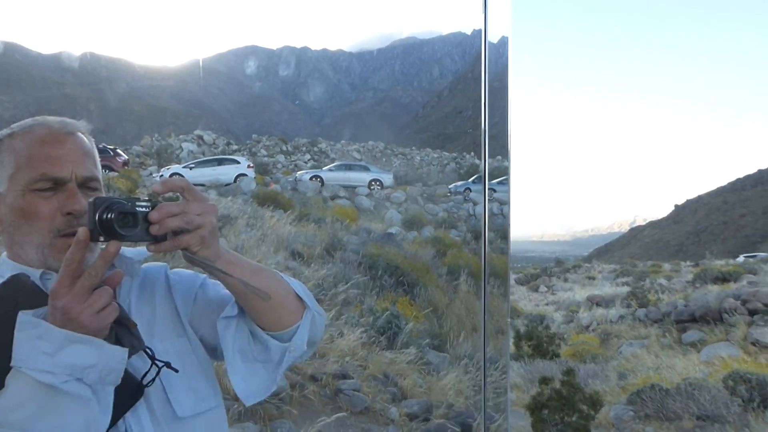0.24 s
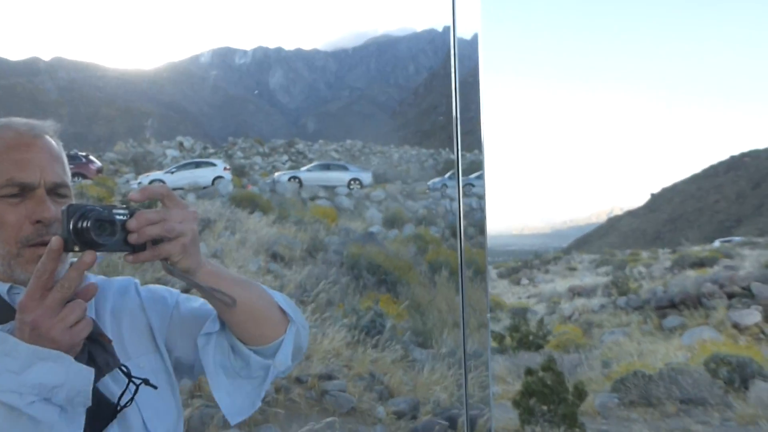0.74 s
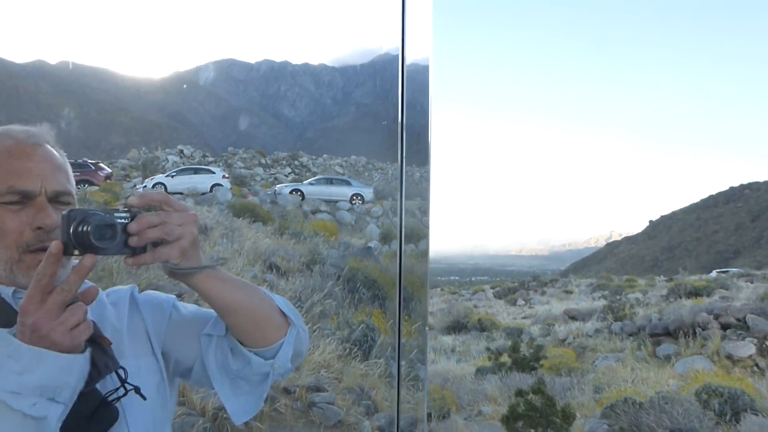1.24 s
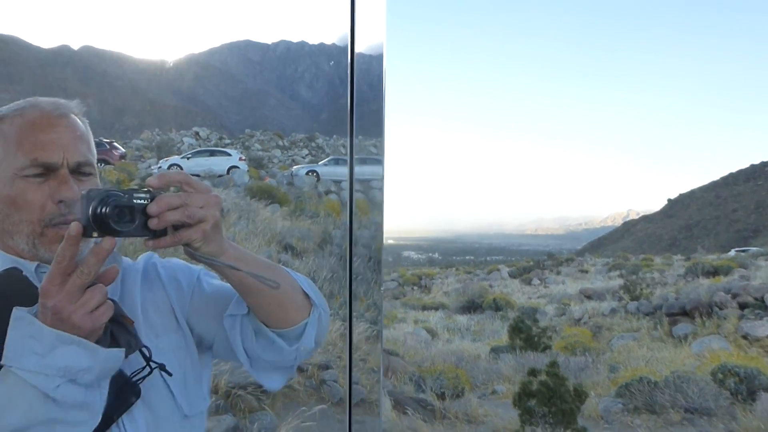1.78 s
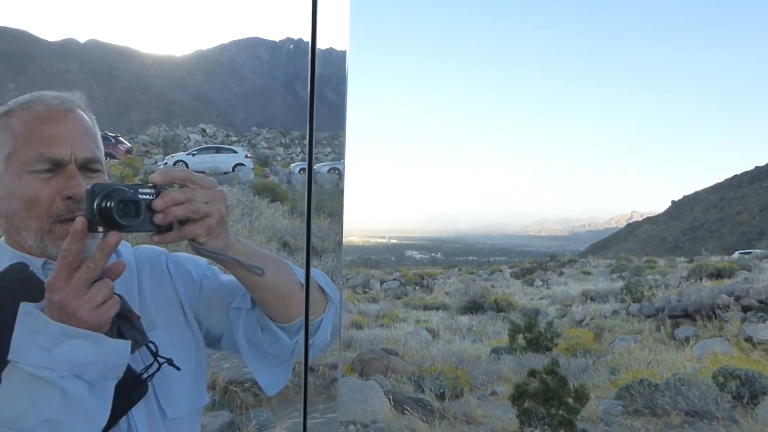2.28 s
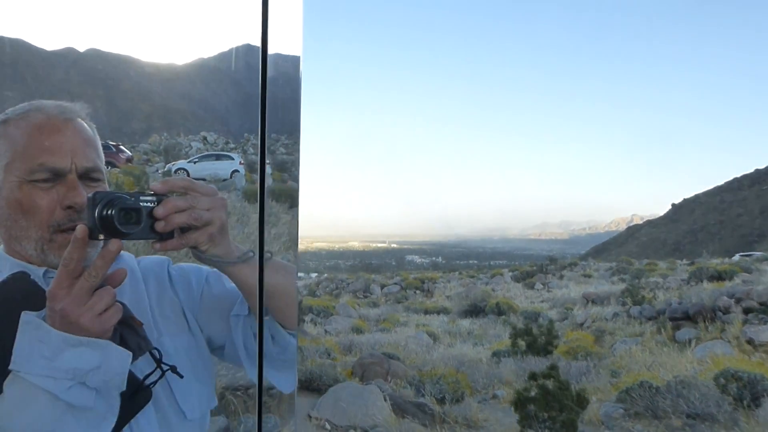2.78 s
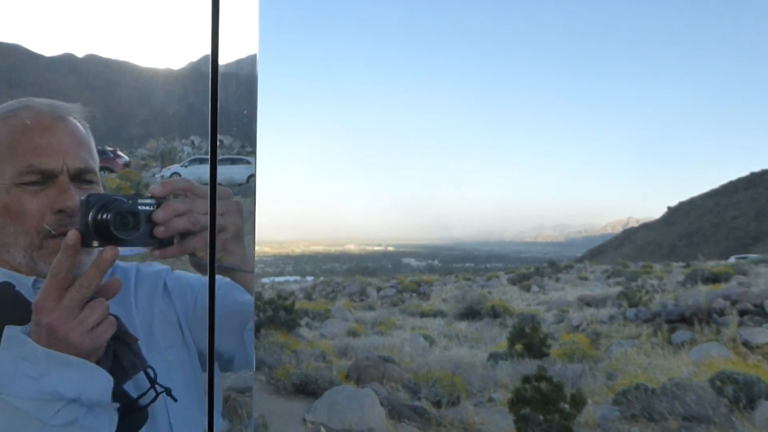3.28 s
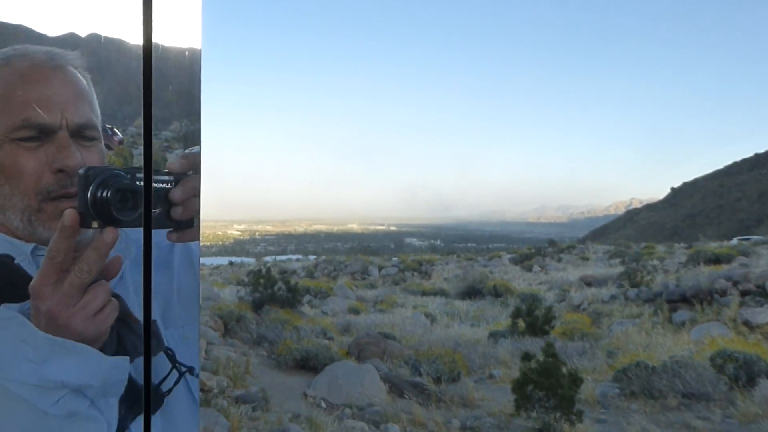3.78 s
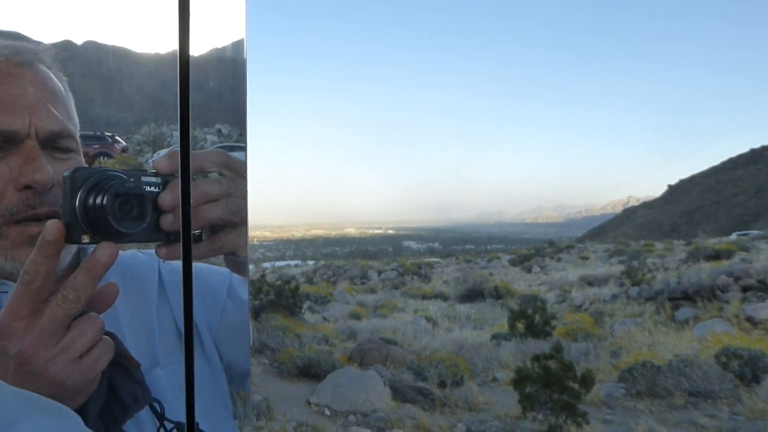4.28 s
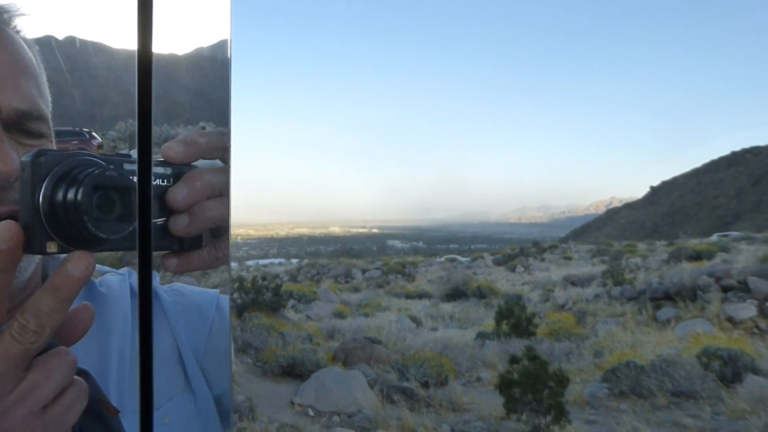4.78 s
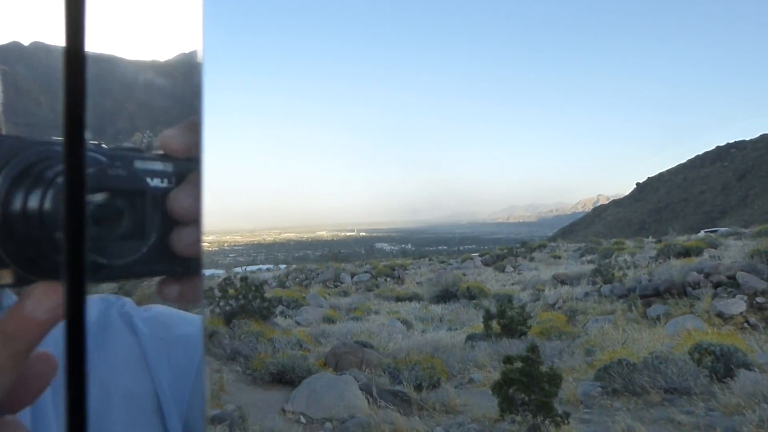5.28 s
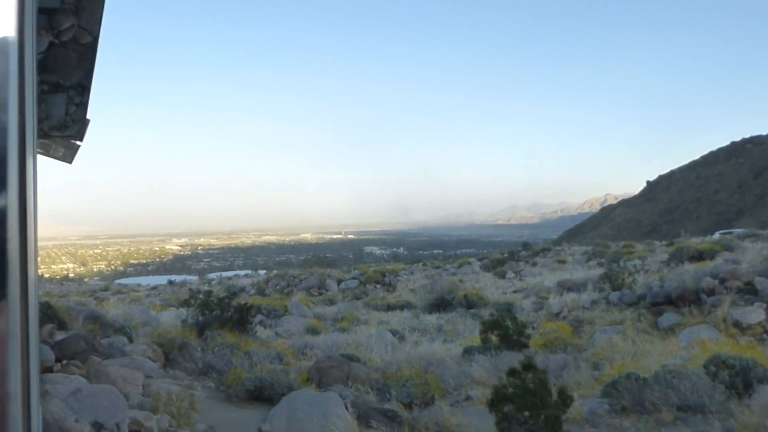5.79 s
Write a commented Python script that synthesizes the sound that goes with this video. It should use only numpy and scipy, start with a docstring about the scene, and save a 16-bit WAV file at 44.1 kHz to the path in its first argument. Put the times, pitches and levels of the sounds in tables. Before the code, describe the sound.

A continuous rough rush of wind swells and eases outdoors, rumbling and thumping on the microphone.

```python
"""A strong, gusty wind rushes, rumbles and thumps across a small microphone in open, dry hills.
The rush is made of eddies (little swirls of air) passing the microphone's opening. Faster air
carries finer eddies, so the treble rises far more than the roar, the lower body of the sound.
Short puffs sharpen the rush. Large eddies thump and rumble on the diaphragm, the thin skin
inside the microphone."""
import sys
import numpy as np
from scipy import signal
from scipy.io import wavfile
from scipy.ndimage import uniform_filter1d

SR = 44100
rng = np.random.default_rng(int(sys.argv[2]) if len(sys.argv) > 2 else 0)


def log_audio(samples):
    """Write samples as a 16-bit WAV file to the path given in sys.argv[1]."""
    # one column per channel
    frames = np.atleast_2d(samples).T
    # limit to full scale, then quantise
    limited = np.clip(frames, -1, 1)
    pcm = np.round(limited * 32767).astype(np.int16)
    wavfile.write(sys.argv[1], SR, pcm)


N = 266584

# The wind's slow swell; "gust" mainly sets the treble. Columns: time_s, gust_db, roar_db, rumble_db
WIND_SWELL = [(0.0, -39.5, -21, -27), (0.2, -43.5, -25.5, -28), (0.45, -45, -23.5, -26),
              (0.8, -49.5, -25, -28.5), (1.1, -44.5, -28.5, -24), (1.45, -41, -30, -30.5),
              (1.85, -41, -28, -28), (2.13, -50, -28.5, -31), (2.45, -44, -30, -25),
              (2.8, -42.5, -29.5, -29), (3.2, -35.5, -25.5, -25.5), (3.55, -36.5, -27.5, -27.5),
              (3.9, -38, -28, -29), (4.5, -44.5, -29.5, -26.5), (4.56, -49.5, -30, -30.5),
              (4.97, -49, -27, -28.5), (5.12, -46, -25.5, -23.5), (5.4, -46, -28.5, -27.5),
              (5.68, -45.5, -25.5, -28.5), (5.76, -58, -34.5, -30), (6.04, -55.5, -27.5, -30.5)]
# Puffs (+) and lulls (-), each lasting about 1.5 times its width.
# Columns: middle_s, width_s, gust_change_db, roar_change_db
PUFFS_AND_LULLS = [(0.064, 0.052, 3.5, 2.5), (0.459, 0.053, 4, 0), (0.675, 0.037, 6.5, -3.5),
                   (0.712, 0.022, -6, -5), (0.78, 0.064, -5, -4), (0.961, 0.034, 8.5, 7.5),
                   (1.109, 0.011, -2, 6), (1.122, 0.014, -11, -8), (1.142, 0.0087, 1, 10),
                   (1.19, 0.0092, 0, 12), (1.215, 0.025, -5, -4.5), (1.25, .03, 5.5, 1),
                   (1.358, .02, 5, 5.5), (1.379, .014, -4, -6), (1.415, .014, -4, 0),
                   (1.439, 0.014, -5, 10.5), (1.475, 0.048, 4.5, 3), (1.517, .012, 4.5, 7.5),
                   (1.535, 0.015, -2, -10), (1.63, 0.026, 4.5, 5), (1.814, 0.029, 3, -3),
                   (1.988, 0.018, 4, 3.5), (2.044, .03, -5, 4.5), (2.088, 0.0076, 6, 8),
                   (2.138, 0.01, -13, 4.5), (2.232, 0.055, 6.5, 4), (2.339, 0.055, 1.5, 6.5),
                   (2.394, 0.015, -3, 8.5), (2.4, 0.011, -10, -2), (2.559, 0.19, -11.5, -2.5),
                   (2.643, 0.011, 8, 9), (2.669, 0.017, 3, 8.5), (2.694, 0.015, -1, 12),
                   (2.792, 0.027, 5.5, 4), (3.103, 0.018, -2, 9), (3.153, 0.021, 1, 1), (3.228, .03, 3, 0),
                   (3.263, 0.031, -2, -5.5), (3.321, 0.044, -4.5, -4.5), (3.39, .05, -6, -2),
                   (3.988, 0.034, -4.5, -3), (4.314, 0.039, -7, -1.5), (4.389, .045, 1.5, 3.5),
                   (4.522, 0.016, 6, 6.5), (4.603, .07, -6, -1.5), (4.659, 0.028, -6, -8),
                   (4.723, .03, 6.5, 3), (4.93, 0.12, -9.5, -5), (5.181, 0.025, 7, 0.5),
                   (5.212, 0.014, -4, -12), (5.358, .012, 6, 5), (5.502, 0.092, -9.5, -5),
                   (5.701, 0.014, 3.5, 2.5), (5.747, 0.029, -21, 2), (5.776, .012, 3, 7),
                   (5.872, 0.033, -9, -5.5), (5.915, 0.046, 1, 10.5), (5.963, .02, 6, 6)]
# The strongest large eddies hitting the diaphragm. Columns: middle_s, peak_db, pitch_hz
BIG_THUMPS = [(0.09, -18, 101), (0.121, -15, 106), (0.29, -11, 136), (0.549, -15, 203), (0.597, -11, 130),
              (0.981, -17, 93), (1.107, -10.5, 116), (1.149, -8, 151), (1.196, -18, 133),
              (1.368, -8.5, 127), (1.438, -14, 102), (1.482, -7, 202), (1.515, -12.5, 188),
              (1.643, -12, 158), (1.703, -11, 163), (1.761, -10.5, 108), (1.995, -12, 198),
              (2.143, -6, 230), (2.353, -17, 115), (2.667, -8, 173), (2.704, -12.5, 129), (2.788, -9, 187),
              (2.808, -11.5, 200), (2.873, -12.5, 145), (3.223, -15, 144), (3.791, -13.5, 143),
              (4.029, -12, 183), (4.981, -14, 145), (5.061, -22, 120), (5.112, -9.5, 132), (5.18, -12, 182),
              (5.961, -18, 150)]
# The tone of the rush in a strong gust. Columns: frequency_hz, relative_level_db
RUSH_TONE = [(120, -17), (250, -7), (400, -2.5), (800, -4.5), (1500, -3), (2500, -6), (3500, -10.5),
             (5400, -17), (8000, -26.5), (11000, -34.5), (15500, -42.5)]
# How the rush follows the wind. Columns: frequency_hz, db_per_gust_db, db_per_roar_db
RUSH_RESPONSE = [(300, -0.04, 0.59), (796, -0.15, 0.8152), (1430, 0.05, 0.67), (2390, 0.38, .5),
                 (3860, .5, 0.38), (5800, 0.83, 0.33), (8750, 1.05, 0.12), (14000, 1.3, 0.27)]
# The tone of the large eddies' rumble. Columns: frequency_hz, relative_level_db
RUMBLE_TONE = [(10, -40), (25, -9), (45, -10.5), (70, -2.5), (115, -2), (200, -6.5), (350, -10),
               (600, -23.5), (1200, -22.5), (3000, -100)]

STRONG_GUST_DB, STRONG_ROAR_DB = -40, -28  # the wind in which the rush has the tone of RUSH_TONE


def rush(t, gust_db, roar_db):
    """Fine eddies pass the opening: the gust brightens their noise, the roar lifts its body."""
    hz = np.fft.rfftfreq(256, 1 / SR)
    response_hz, per_gust, per_roar = np.transpose(RUSH_RESPONSE)
    patches = rng.standard_normal((len(t), len(hz)))  # louder and softer spots in time and pitch
    patches = uniform_filter1d(patches, size=9, axis=0)
    patches = unit_level(uniform_filter1d(patches, size=7, axis=1))
    upper_middle = np.exp(-(np.log((hz + 1) / 2800) / 0.85) ** 2)
    flapping = wander(t, 8, 150)[:, None] * upper_middle  # this band flutters on its own
    tone_db = tone_curve(hz, *np.transpose(RUSH_TONE)) + 0.45 * patches + 1.1 * flapping
    tone_db += gust_db[:, None] * tone_curve(hz, response_hz, per_gust)
    tone_db += roar_db[:, None] * tone_curve(hz, response_hz, per_roar)
    # The smallest eddies roughen the level.
    grit = signal.oaconvolve(rng.standard_normal(N), signal.windows.blackman(90), "same")
    return shaped_noise(gain_of(tone_db - 31), size=256) * gain_of(1.5 * unit_level(grit))


def air_stream(t):
    """The wind swells, puffs, surges and flutters. Gives gust, roar and the roar's quick part in dB."""
    time_s, swell_gust_db, swell_roar_db, _ = np.transpose(WIND_SWELL)
    puff_gust_db, puff_roar_db = puffs(t)
    thump_s, thump_db, _ = np.transpose(BIG_THUMPS)
    slap_shapes = np.exp(-((t[:, None] - thump_s) / 0.0017) ** 2)
    slap_db = slap_shapes @ (0.25 * (thump_db + 19.5))  # thumps above -19.5 dB briefly lift the roar
    gust_db = np.interp(t, time_s, swell_gust_db) - STRONG_GUST_DB + puff_gust_db
    gust_db += 0.96 * wander(t, 8, 45) + 1.57 * wander(t, 30, 300)  # surges, then faster flutter
    quick_db = puff_roar_db + slap_db + 0.98 * wander(t, 7, 45) + 0.7 * wander(t, 18, 200)
    roar_db = np.interp(t, time_s, swell_roar_db) - STRONG_ROAR_DB + quick_db
    return gust_db, roar_db, quick_db


def puffs(t, steepness=3.2, lopsidedness=0.19):
    """A puff builds, then breaks off; a lull drops in, then refills. Gives gust and roar changes in dB."""
    middle_s, width_s, gust_db, roar_db = np.transpose(PUFFS_AND_LULLS)
    offset_s = t[:, None] - middle_s
    side = np.sign(offset_s * (gust_db + roar_db))  # +1 where the wind falls, -1 where it rises
    reach_s = width_s / 2 * (1.5 - lopsidedness * side)
    shapes = np.exp(-abs(offset_s / reach_s) ** steepness)
    return shapes @ gust_db, shapes @ roar_db


def thumps(rows):
    """Each large eddy gives the diaphragm about one push and one pull."""
    sound, t = np.zeros(N), np.arange(N) / SR
    for (middle_s, peak_db, pitch_hz), phase in zip(rows, rng.random(len(rows))):
        near = slice(max(round((middle_s - .03) * SR), 0), round((middle_s + .03) * SR))
        cycles = (t[near] - middle_s) * pitch_hz
        fade = np.exp(-(cycles / 0.38) ** 2)
        sound[near] += gain_of(peak_db) * np.cos(2 * np.pi * (cycles + phase)) * fade
    return sound


def small_thumps(count=36, above_rumble_db=11, spread_db=0.5, low_hz=88, high_hz=207):
    """Weaker eddies hit at random, one in each equal slot of time, louder when the rumble swells."""
    when, strength, pitch = rng.random((count, 3)).T
    time_s, _, _, rumble_db = np.transpose(WIND_SWELL)
    middle_s = (np.arange(count) + when) * N / SR / count
    peak_db = np.interp(middle_s, time_s, rumble_db) + above_rumble_db + spread_db * (2 * strength - 1)
    pitch_hz = low_hz * (high_hz / low_hz) ** pitch
    return thumps(np.transpose([middle_s, peak_db, pitch_hz]))


def rumble(t, quick_roar_db):
    """Large, slow eddies make lumpy low noise that partly follows the puffs and the roar's quick part."""
    hz = np.fft.rfftfreq(4096, 1 / SR)
    tone = gain_of(tone_curve(hz, *np.transpose(RUMBLE_TONE)))
    low_noise = unit_level(shaped_noise(np.tile(tone, (N // 1024 + 5, 1)), size=4096))
    time_s, _, _, swell_db = np.transpose(WIND_SWELL)
    level_db = np.interp(t, time_s, swell_db) + wander(t, 2.5, 8) + 1.6 * wander(t, 8, 60)
    puff_gust_db, _ = puffs(t)
    level_db += uniform_filter1d(0.45 * quick_roar_db + 0.16 * puff_gust_db, size=7)
    return low_noise * gain_of(np.interp(np.arange(N) / SR, t, level_db))


def gain_of(db):
    """Turn decibels into a number to multiply by."""
    return 10 ** (np.asarray(db) / 20)


def unit_level(x):
    """Scale a signal to an average power of 1."""
    return x / np.sqrt(np.mean(x ** 2) + 1e-20)


def tone_curve(hz, points_hz, values):
    """Join points with straight lines on a scale of octaves."""
    return np.interp(np.log(hz + 1), np.log(np.asarray(points_hz) + 1), values)


def wander(t, low_hz, high_hz, count=60):
    """A random wobble: many sine waves, each starting anywhere in its cycle."""
    rates_hz = np.geomspace(low_hz, high_hz, count)
    return unit_level(np.sin(2 * np.pi * (rates_hz * t[:, None] + rng.random(count))).sum(1))


def shaped_noise(strength, size):
    """Noise shaped by a grid of strengths: a row for each moment, a column for each frequency."""
    real, imaginary = rng.standard_normal((2,) + strength.shape)
    spectra = strength * (real + 1j * imaginary)
    return signal.istft(spectra.T, nperseg=size, noverlap=size - size // 4)[1][:N]


def scene():
    """Add the wind's rush, rumble and thumps into one channel."""
    t = np.arange(N // 64 + 5) * 64 / SR  # seconds, one step every 64 samples
    gust_db, roar_db, quick_roar_db = air_stream(t)
    wind = rush(t, gust_db, roar_db) + rumble(t, quick_roar_db)
    return (wind + thumps(BIG_THUMPS) + small_thumps())[None]


def record(dry):
    """The microphone loses the deepest bass, and the recorder cuts the highest treble."""
    bass_cut_hz, treble_cut_hz = 30, 15700
    thinned = signal.sosfilt(signal.butter(2, bass_cut_hz, "high", fs=SR, output="sos"), dry)
    treble_filter = signal.firwin(1023, treble_cut_hz, window=("kaiser", 9), fs=SR)
    return signal.oaconvolve(thinned, treble_filter[None], "same")


dry = scene()
out = record(dry)
log_audio(out)
```